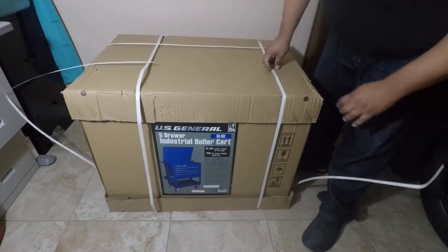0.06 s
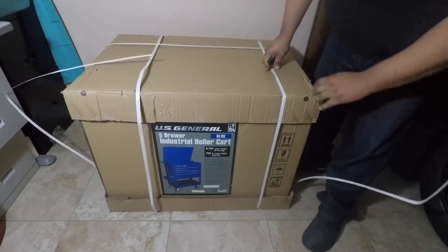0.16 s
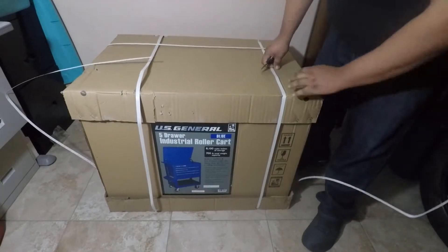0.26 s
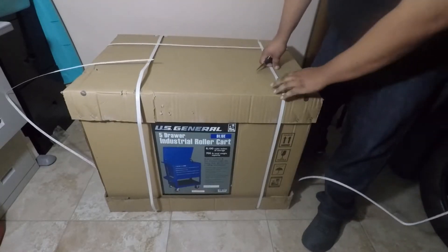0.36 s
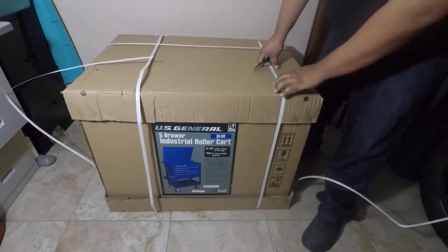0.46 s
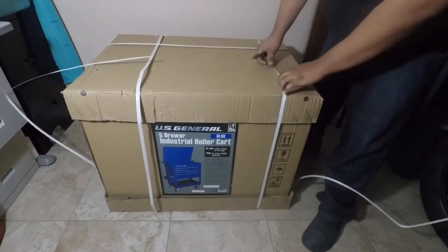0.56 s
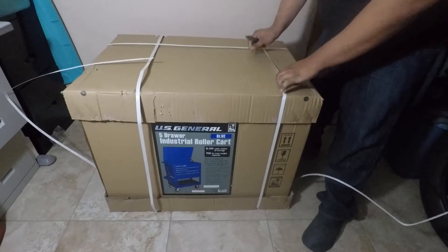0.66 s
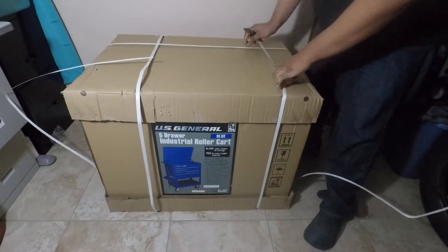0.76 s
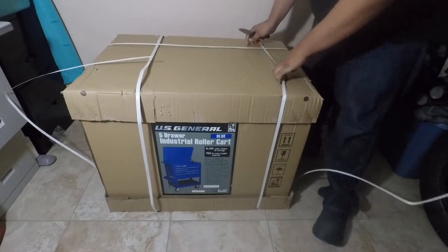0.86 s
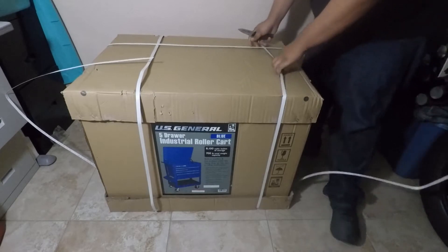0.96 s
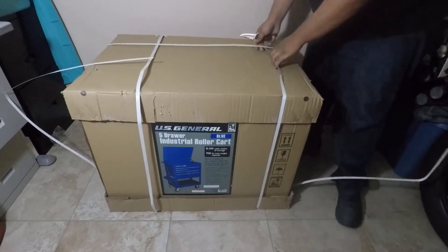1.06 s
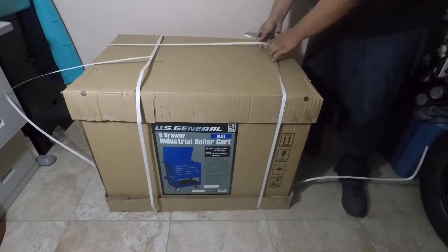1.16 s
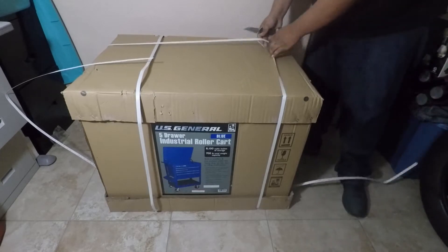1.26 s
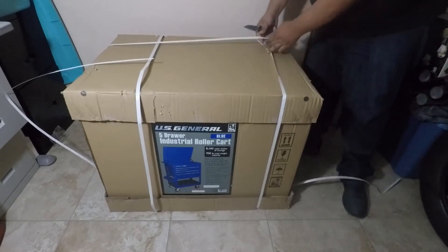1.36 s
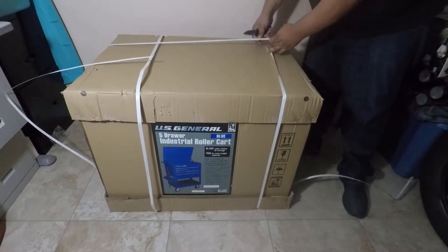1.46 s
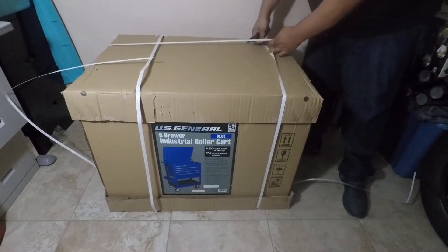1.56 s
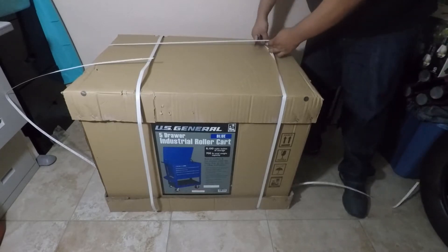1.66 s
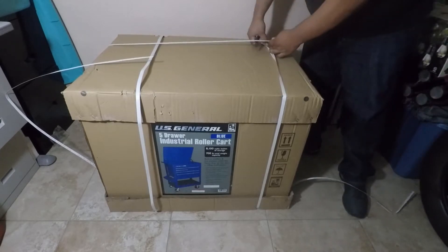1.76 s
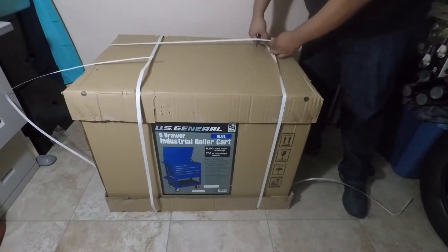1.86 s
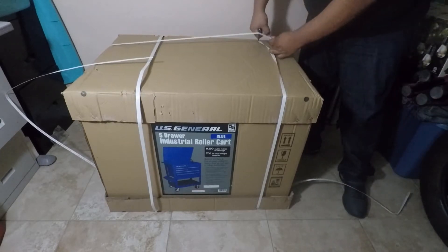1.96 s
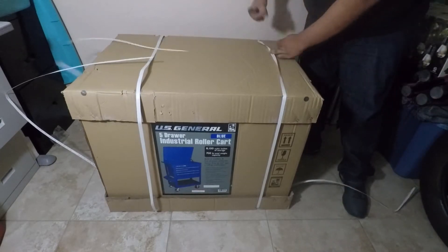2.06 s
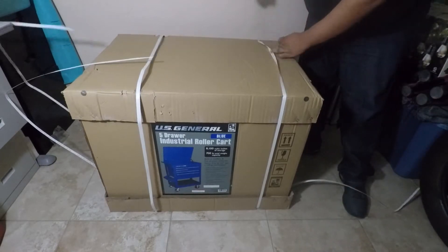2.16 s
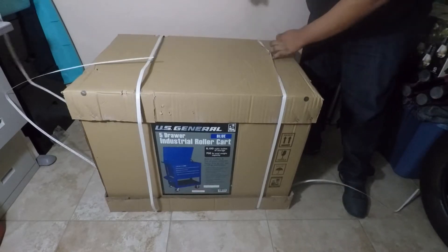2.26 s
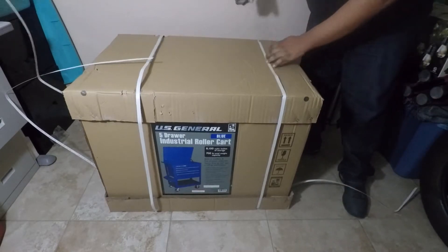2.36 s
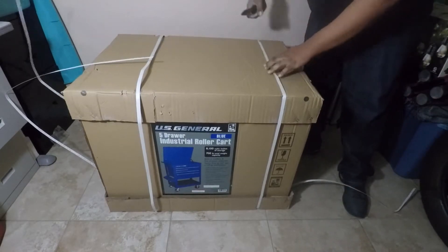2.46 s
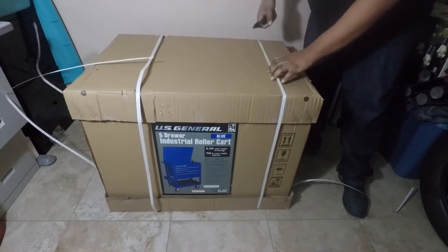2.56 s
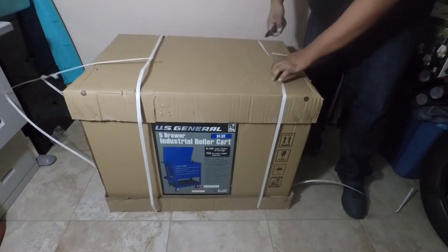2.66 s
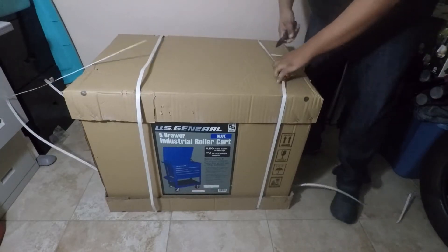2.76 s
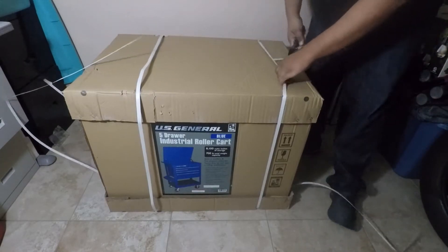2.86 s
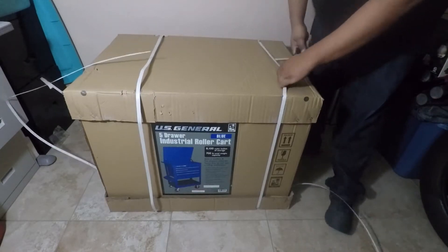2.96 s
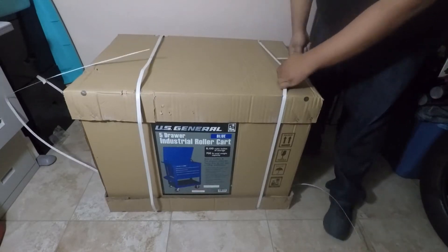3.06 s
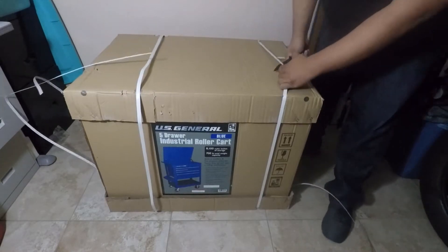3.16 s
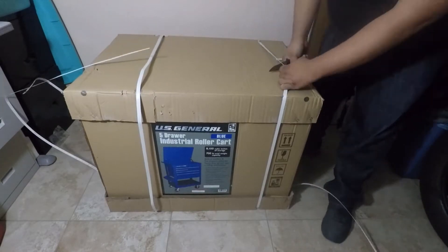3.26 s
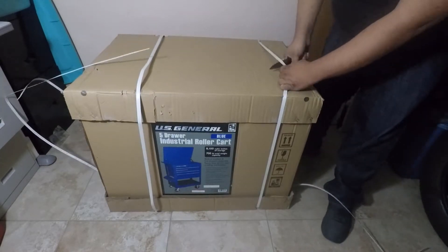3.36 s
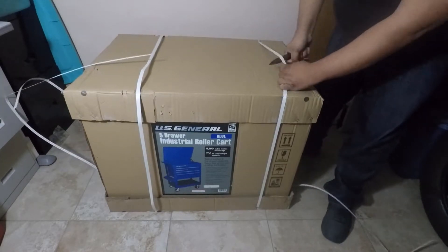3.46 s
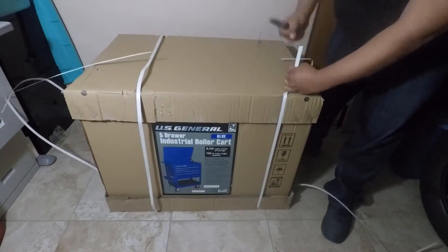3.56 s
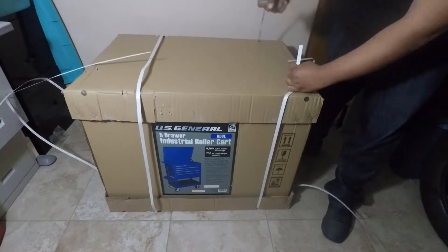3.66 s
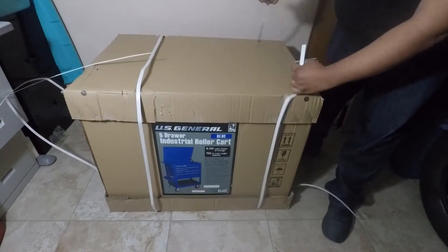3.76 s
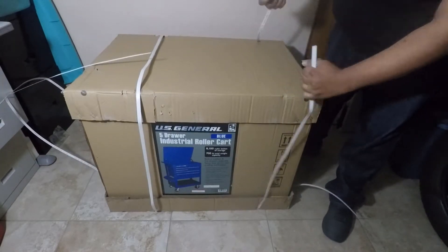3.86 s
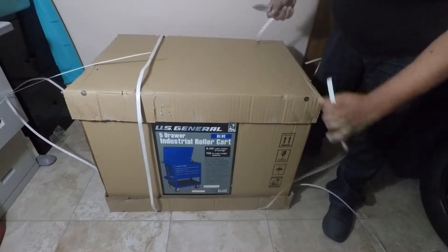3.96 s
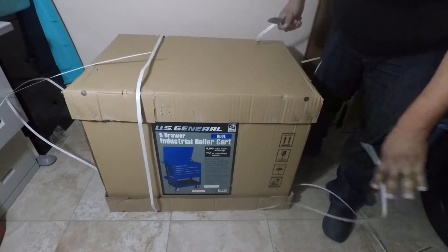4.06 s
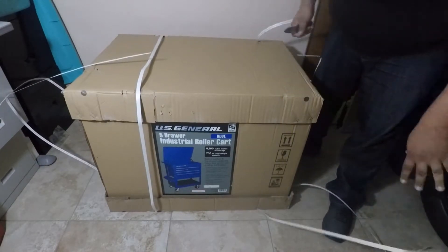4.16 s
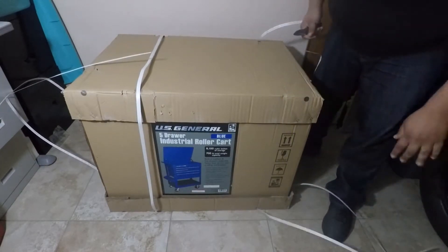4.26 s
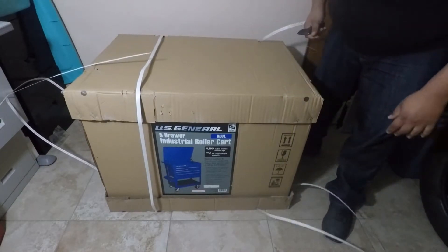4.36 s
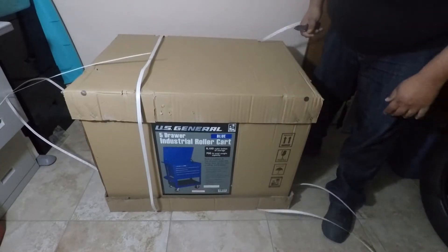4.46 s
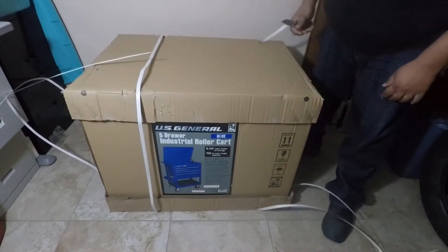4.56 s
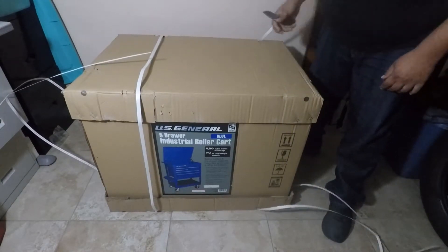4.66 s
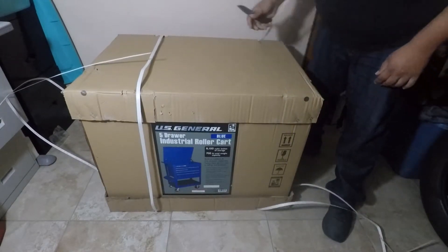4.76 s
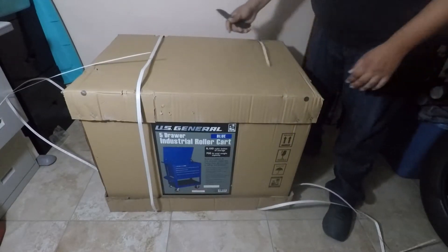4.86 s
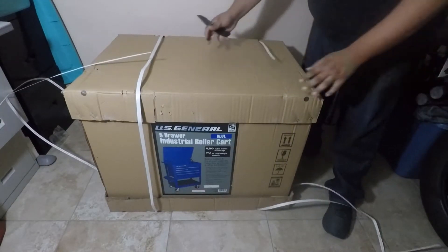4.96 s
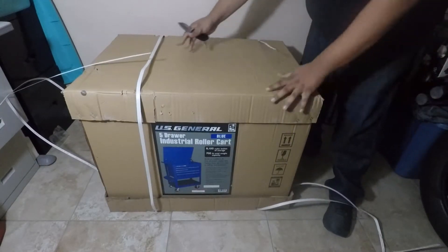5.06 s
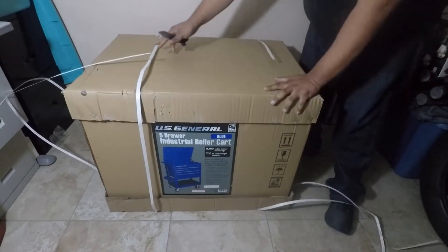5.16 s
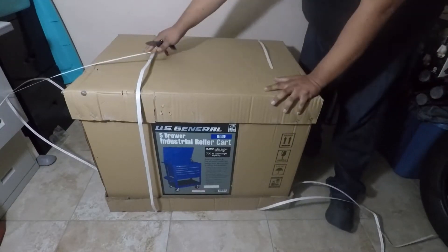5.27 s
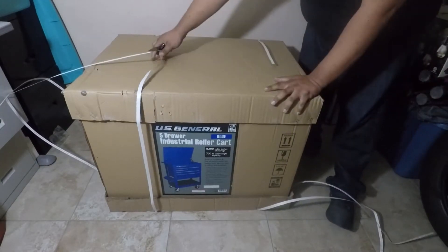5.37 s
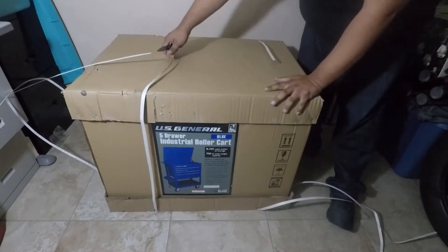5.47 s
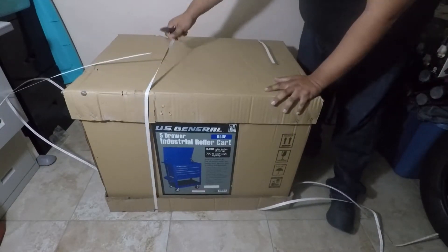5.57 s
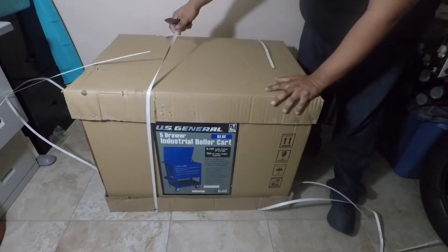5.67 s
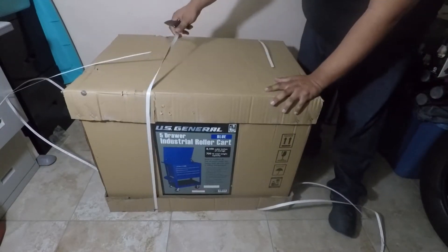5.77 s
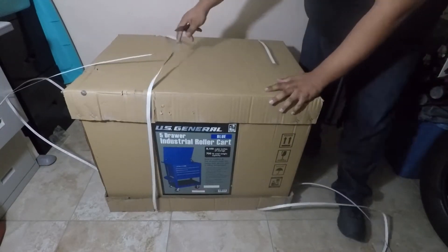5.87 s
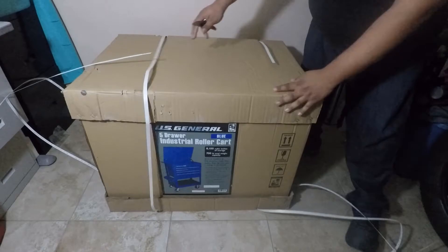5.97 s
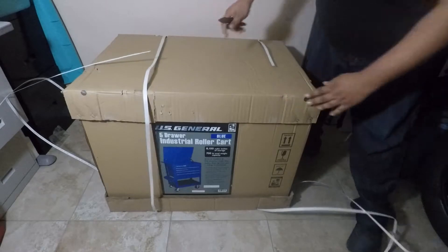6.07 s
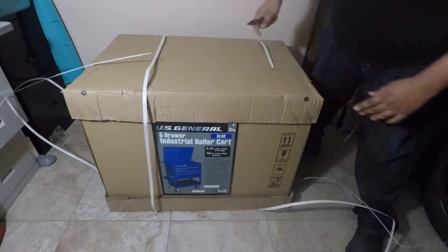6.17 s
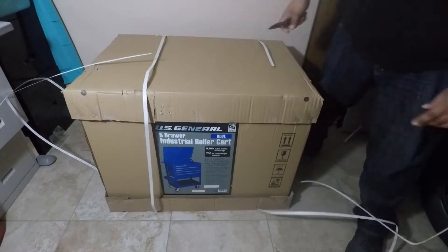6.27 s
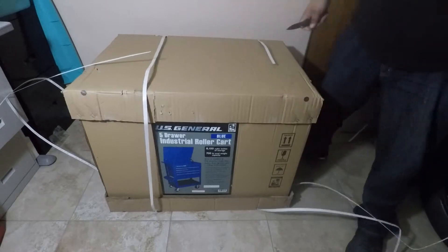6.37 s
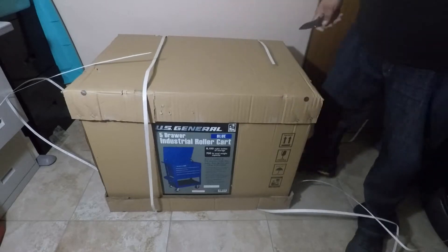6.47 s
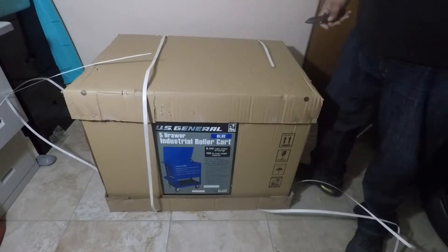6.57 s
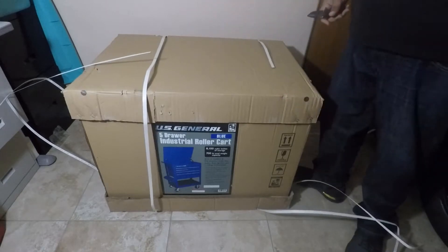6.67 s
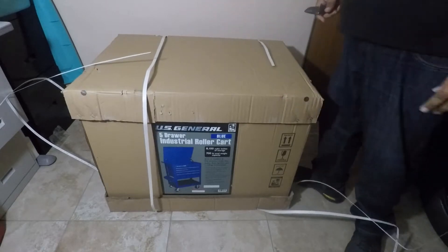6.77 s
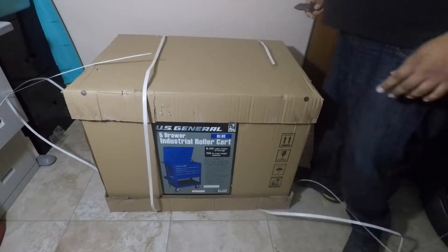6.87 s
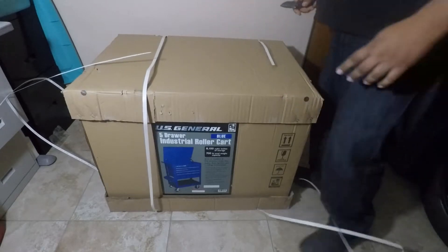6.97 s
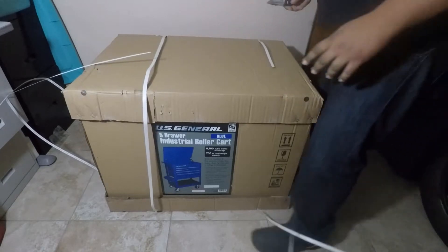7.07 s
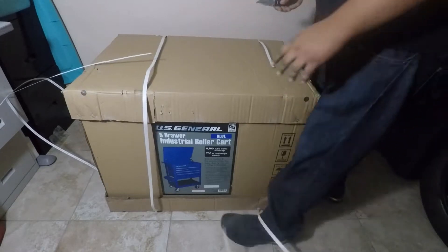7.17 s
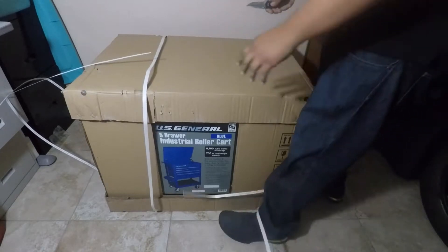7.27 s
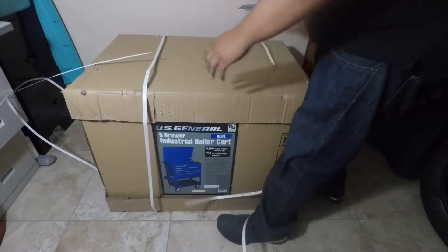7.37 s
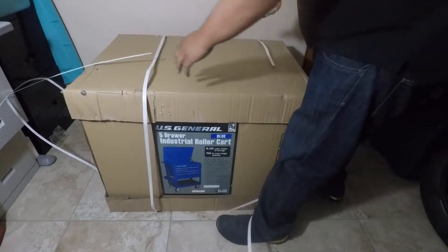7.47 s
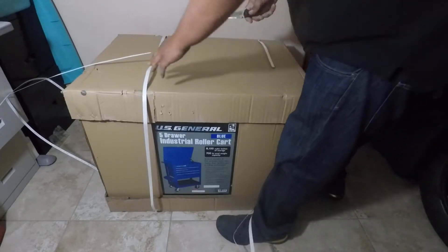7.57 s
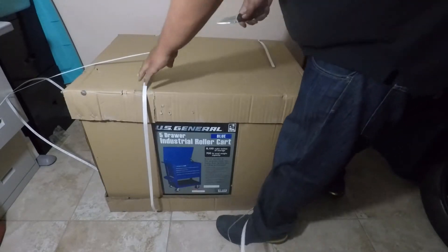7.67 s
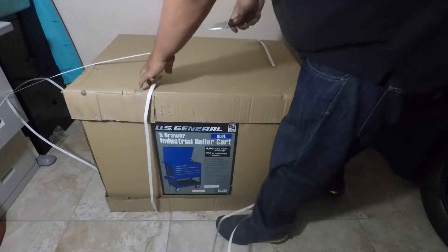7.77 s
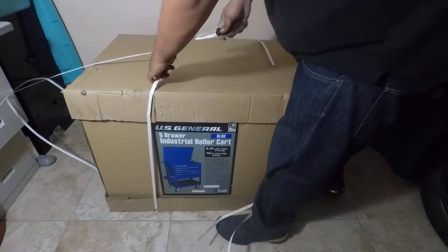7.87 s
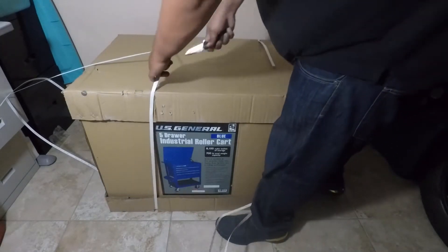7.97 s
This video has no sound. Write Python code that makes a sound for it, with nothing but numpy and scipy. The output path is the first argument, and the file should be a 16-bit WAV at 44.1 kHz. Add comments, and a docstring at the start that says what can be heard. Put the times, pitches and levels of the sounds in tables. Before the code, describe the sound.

Two loud strap snaps boom a big carton, then dragging hiss, a brief blade ring, a short judder and a weaker snap.

```python
"""Small tiled room, close to a big cardboard box: plastic packing straps are cut off it. First the straps tick
and scrape over the cardboard and hands bump the lid, as they do throughout. At 2.0 s a taut strap cracks, booms
the box and overloads the microphone; its freed end hums. Another parts at 3.5 s, an end flicks off the blade at
4.3 s, a dragged strap judders at 5.5 s and a weaker snap follows at 5.9 s; pulls, slaps, a scuff over the tiles
and bumps close the scene. Noise bursts, damped modes and filtered noise make it."""
import sys
import numpy as np
from scipy import signal
from scipy.fft import rfft, irfft
from scipy.io import wavfile
from scipy.ndimage import uniform_filter1d

SR = 44100
rng = np.random.default_rng(int(sys.argv[2]) if len(sys.argv) > 2 else 0)


def master(y):
    """Save y as 16-bit WAV."""
    cut = np.clip(np.atleast_2d(y).T, -1, 1)
    pcm = np.round(cut * 32767)  # scale
    wavfile.write(sys.argv[1], SR, pcm.astype(np.int16))


N = 353682
T = np.arange(N) / SR
HIT = T[:16384]  # time axis of one hit [s]

# All levels are at the source, ahead of the room and the microphone.
# Taut straps letting go: (time [s], crack level [dB], crack t60 [s], treble tilt [dB/octave],
# box boom level [dB], lid ring level [dB])
STRAP_SNAPS = [(2.043, -5, 0.081, -0.6, -13, -12), (3.5236, -4.5, .05, 0.8, -9, -26.5),
               (5.9190, -16, 0.0167, -0.06, -29.5, -15)]
# Spectrum of a parting strap: (frequency [Hz], relative level [dB])
CRACK_SPECTRUM = [(24, -31.5), (40, -12.5), (133, -8), (312, -11), (402, -5), (479, -9), (542, -5.5),
                  (1410, -9.5), (2150, -15.5), (3650, -15), (4800, -21), (7360, -20), (11800, -42),
                  (14500, -33), (16000, -46.5)]
# Modes of the box: (frequency [Hz], relative level [dB], t60 [s])
BOX_MODES = [(57, -19, 0.33), (95, -6, 0.24), (127, -4.5, 0.1), (162, 0, 0.11), (216, -4.5, 0.22),
             (258, 1.5, 0.13), (310.2, -3, 0.33), (351, -12.5, .15), (475, -4.5, 0.11), (604.4, -9, .09),
             (699, -6, 0.069), (800, -6, 0.041), (1060, -4.5, 0.082), (1180, -9.5, 0.15), (1432, -8.5, .17)]
# Modes of the free middle of the lid: (frequency [Hz], relative level [dB], t60 [s])
LID_MODES = [(309.7, 3.5, 0.15), (272, -2.5, 0.094), (360, -12.5, 0.18), (630, -9, 0.014),
             (1410, -16, 0.061)]
# Loose ends slapping box and tiles: (time [s], nominal level [dB], t60 [s], treble tilt [dB/octave])
END_SLAPS = [(0.003, -38, 0.077, 5), (2.089, -22.5, 0.035, 5), (3.542, -20.5, .01, 12),
             (3.55, -32, 0.022, 12), (3.6149, -20.5, 0.051, 0.2), (3.9145, -43.5, 0.014, 3),
             (4.318, -38, 0.02, -1), (7.3454, -22, 0.012, 0.5), (7.3556, -31, 0.013, -2.5)]
# Spectrum of a flat slap: (frequency [Hz], relative level [dB])
SLAP_SPECTRUM = [(47, -47), (80, -9.5), (283, -7.5), (431, -7.5), (575, -2), (1050, -8.5), (1430, -9),
                 (2080, -6), (3790, -12), (4620, -16), (8230, -17), (15000, -37.5), (16000, -61)]
# Bending modes of a loose end: (frequency [Hz], relative level [dB], t60 [s])
STRAP_MODES = [(1431, -3.5, 0.083), (1740, -8.5, .04), (2410, -2, 0.017), (3690, -8, .025),
               (4036, -1.5, 0.029)]
# Ticks of blade and strap edge: (time [s], nominal level [dB], brightest frequency [Hz], t60 [s])
EDGE_TICKS = [(0.031, -45, 6300, 0.007), (0.562, -40, 6160, 0.05), (0.852, -44.5, 7100, 0.19),
              (1.316, -49, 5000, 0.058), (1.345, -43.5, 5850, 0.0075), (1.561, -44.5, 3670, 0.029),
              (1.7348, -45.5, 3620, 0.022), (1.753, -42, 5260, 0.044), (1.977, -48, 3840, .025),
              (2.034, -33, 4000, 0.091), (2.372, -42.5, 5650, 0.025), (2.888, -44.5, 3080, 0.027),
              (3.0544, -48, 5500, .004), (3.314, -52.5, 4960, .01), (3.799, -45, 4516, 0.055),
              (4.52, -50.5, 5000, .01), (4.631, -51, 7030, 0.015), (4.9055, -34, 7450, 0.01),
              (4.9455, -44, 9000, 0.0045), (5.118, -41, 11700, 0.017), (5.120, -35.5, 1620, 0.024),
              (5.324, -50, 7200, 0.013), (5.3794, -40, 7240, 0.041), (5.6359, -35.5, 3900, 0.0045),
              (5.9279, -25, 6070, 0.0042), (6.608, -52, 6015, 0.043), (7.276, -44.5, 8000, 0.11),
              (7.7592, -41.5, 6830, 0.0066), (7.919, -42, 4570, 0.0067)]
# Modes of the blade: (frequency [Hz], relative level [dB], t60 [s])
BLADE_MODES = [(7140, -10, .2), (7600, -3, 0.17), (7967, 8, 0.22), (8300, -2.5, .22), (8750, -13.5, .18),
               (4170, -5, 0.16), (2530, -11, 0.22)]
# Pulls of a strap over the cardboard: (start [s], length [s], share spent speeding up [0-1],
# edge hiss gain [dB], cardboard rub gain [dB])
STRAP_PULLS = [(0.21, 0.39, 0.17, -62, -65.5), (0.458, 0.14, 0.24, -50, -49.5),
               (0.568, 0.12, 0.27, -57.5, -45.5), (0.706, .16, 0.47, -57.5, -58),
               (0.828, .34, 0.14, -46, -48), (1.06, 0.3, .3, -53, -54.5), (1.317, 0.14, 0.21, -70, -49.5),
               (1.725, 0.16, 0.16, -61, -48.5), (1.894, 0.15, 0.68, -51, -48),
               (2.113, 0.27, .3, -44, -41.5), (2.402, 0.23, 0.1, -45.5, -49),
               (2.595, 0.16, 0.32, -44.5, -42.5), (2.756, 0.091, 0.57, -42.5, -42),
               (2.841, 0.12, .1, -54.5, -53), (2.938, 0.49, 0.11, -65, -60),
               (3.41, 0.15, 0.46, -57.5, -54.5), (3.729, 0.15, 0.37, -52.5, -47.5),
               (4.501, 0.42, 0.16, -63, -65), (4.986, 0.12, 0.36, -58.5, -57),
               (5.347, 0.18, 0.62, -40.5, -40), (5.536, 0.17, 0.37, -47.5, -46),
               (5.74, 0.24, 0.23, -52, -52), (5.942, 0.19, 0.17, -48, -62),
               (6.602, 0.074, 0.13, -52.5, -58), (7.169, .17, 0.47, -53.5, -57), (7.43, 0.3, .3, -61, -63),
               (7.736, 0.35, .15, -51.5, -51.5)]
# Spectrum of the sliding edge: (frequency [Hz], relative level [dB])
HISS_SPECTRUM = [(710, -32), (1200, -8), (1430, 0), (1750, -7), (7660, -4.5), (12300, -14), (14700, -11),
                 (15500, -16), (16000, -38)]
# Spectrum of the rubbed cardboard: (frequency [Hz], relative level [dB])
RUB_SPECTRUM = [(21, -35.5), (35, -3), (59, -4), (133, -4), (166, -3), (231, -4.5), (305, 0), (376, -3),
                (677, -3.5), (1060, -10), (1430, -10), (1760, -23), (2200, -19.5), (2860, -48),
                (4840, -120)]
# Hands and straps bumping the cardboard, and at 7.16-7.22 s a strap scuffing over the tiles, falling in pitch:
# # (time [s], nominal level [dB], contact corner [Hz], rattle t60 [s])
BUMPS_AND_SCUFF = [(0.002, -31.5, 715, 0.043), (0.404, -38.5, 201, 0.063), (0.852, -31.5, 383, 0.036),
                   (0.878, -27.5, 350, 0.02), (1.321, -38, 790, 0.17), (1.563, -40.5, 684, 0.02),
                   (1.751, -39.5, 905, 0.053), (2.818, -36.5, 600, 0.058), (3.244, -44, 450, 0.075),
                   (3.915, -40, 874, 0.017), (4.915, -37, 850, 0.18), (5.096, -34.5, 245, 0.028),
                   (5.119, -23, 347, 0.022), (5.273, -37.5, 336, 0.014), (5.324, -42, 400, 0.052),
                   (5.381, -37.5, 400, 0.067), (6.198, -52, 906, 0.0173), (6.67, -47.5, 903, 0.043),
                   (7.1566, -45, 1900, 0.018), (7.181, -42.5, 950, .03), (7.223, -51, 450, 0.046),
                   (7.756, -40, 405, 0.022), (7.891, -36.5, 220, .08), (7.919, -40.5, 755, 0.029)]
# The box's broad walls giving under a push: (time [s], level [dB])
WALL_PUSHES = [(0.41, -39), (1.291, -38), (2.5, -34.5), (2.76, -39.5), (5.128, -33.5), (5.326, -35),
               (5.458, -29.5), (7.754, -39)]
# Echo of the room: (band centre [Hz], level against the direct sound [dB], t60 [s])
ROOM_ECHO = [(65, -6, 0.29), (269, -4, 0.25), (730, -3, 0.29), (1320, -2, 0.27), (3000, -2.5, 0.35),
             (7000, -2, 0.33), (14100, -4, 0.18)]
# Spectrum of the steady room noise: (frequency [Hz], relative level [dB])
QUIET_SPECTRUM = [(12, -26.5), (20, -7.5), (33, -20), (60, -24.5), (113, -27), (262, -23.5), (319, -30.5),
                  (499, -27.5), (1400, -31), (1710, -33.5), (9140, -39), (14700, -47.5), (16000, -52)]


def snaps(heave_hz=112):
    """The strap parts with a bright click and tears apart; the unloaded walls heave once and ring on."""
    out = np.zeros(N)
    heave_band = [heave_hz / 1.4, heave_hz * 1.5]
    for s, crack_db, t60, tilt_db, boom_db, lid_db in STRAP_SNAPS:
        click = strength(burst(0.0072), crack_db - 16)
        tear = strength(colour(burst(t60), CRACK_SPECTRUM, tilt_db), crack_db)
        body = strength(ring(BOX_MODES), boom_db) + strength(ring(LID_MODES), lid_db)
        heave = strength(band(burst(0.045), heave_band, "bandpass"), boom_db - 3)
        add(out, s, click)
        add(out, s, tear)
        add(out, s + 0.0011, body)
        add(out, s + 0.004, heave)
    return out


def twang(start=2.16, hz=180, slack_hz=156, db=-27.5, t60=0.79, waver=0.049, waver_db=3):
    """The freed strap hums, sinking in pitch and wavering as it slackens."""
    out = np.zeros(N)
    pitch = slack_hz + (hz - slack_hz) * np.exp(-HIT / 0.114)
    pitch = pitch * (1 + waver * walk(23.7)[:len(HIT)])
    onset = 1 - np.exp(-HIT / 0.0077)
    swing = fade(HIT, t60) * onset * undb(waver_db * walk(25.7)[:len(HIT)])
    phase = 2 * np.pi * np.cumsum(pitch) / SR
    add(out, start, strength(np.sin(phase) * swing, db))
    return out


def strap_ends(clack_db=-4.5, tip_db=-11.5, tip_t60=0.028, tip_width=0.09):
    """Flat slaps are broad and make the plastic clack; an edge only ticks, with a short ring of its own."""
    out = np.zeros(N)
    for s, db, t60, tilt_db in END_SLAPS:
        slap = strength(colour(burst(t60), SLAP_SPECTRUM, tilt_db), db - 1)
        clack = strength(ring(STRAP_MODES), db + clack_db)
        add(out, s, slap + clack)
    for s, db, hz, t60 in EDGE_TICKS:
        edge = band(burst(t60), hz / 1.8, "highpass", order=1)
        edge = band(edge, hz * 1.3, "lowpass")
        # the short free end rings near the tick's brightest pitch
        tip_band = [hz / (1 + tip_width), hz * (1 + tip_width)]
        tip = band(burst(tip_t60), tip_band, "bandpass")
        add(out, s, strength(edge, db - 0.3) + strength(tip, db + tip_db))
    return out


def knife(flick_s=4.3238, ring_s=4.3242):
    """A strap end flicks off the blade, which rings briefly in its damped modes."""
    out = np.zeros(N)
    add(out, flick_s, strength(band(burst(0.008), [7300, 8900], "bandpass"), -32))
    add(out, flick_s, strength(band(burst(0.0094), [1500, 6000], "bandpass"), -34.5))
    add(out, ring_s, strength(ring(BLADE_MODES), -37.5))
    return out


def pull(start, length, rise, release=0.28):
    """Speed of the strap in one pull, 0-1: it gathers speed, holds it and slows to rest."""
    done = (T - start) / length
    # rise and release are shares of the pull
    return np.clip(np.minimum(done / rise, (1 - done) / release), 0, 1)


def friction(grain_db, flutter_db):
    """Countless tiny slips of unequal size, in uneven surges."""
    size = np.minimum(rng.exponential(size=N), 6)
    return rng.standard_normal(N) * undb(grain_db * size + flutter_db * walk(45))


def slides(rub_lead_s=0.008):
    """The strap's edge hisses over the paper while the hollow box rumbles under it."""
    hiss_gain, rub_gain = np.zeros(N), np.zeros(N)
    for s, length, rise, hiss_db, rub_db in STRAP_PULLS:
        hiss_gain += undb(hiss_db) * pull(s, length, rise)
        # the cardboard takes the load just before the edge slides
        rub_gain += undb(rub_db) * pull(s - rub_lead_s, length, rise)
    hiss = level(colour(friction(grain_db=3.5, flutter_db=2.1), HISS_SPECTRUM), -2.5)
    rub = level(colour(friction(grain_db=3.5, flutter_db=2.9), RUB_SPECTRUM), -2.4)
    return hiss * hiss_gain + rub * rub_gain


def judder(start=5.4535, length=0.024, hz=238, db=-17, overtone_db=-17):
    """The dragged strap sticks and slips for a few cycles, pumping the lid, which rings on after."""
    out, t = np.zeros(N), T[:int(length * SR)]
    phase = 2 * np.pi * hz * t
    swell = signal.windows.tukey(len(t), 0.4)
    overtones = np.sin(2 * phase) + np.sin(3 * phase) / 2
    pumping = level(np.sin(phase) + undb(overtone_db) * overtones, db)
    scrape = band(rng.standard_normal(len(t)), [4500, 10000], "bandpass", order=1)
    scrape = level(scrape * (1 + np.sin(phase)), -34.5)  # the hiss pulses with each cycle
    add(out, start, swell * pumping)
    add(out, start, swell * scrape)
    add(out, start + length, strength(ring(LID_MODES), -22.5))
    return out


def bumps_and_scuff():
    """Soft blows and a scuff over the tiles: a dead contact sound and a little ring of box and lid."""
    out = np.zeros(N)
    for s, db, hz, t60 in BUMPS_AND_SCUFF:
        contact = strength(band(burst(t60), [hz / 2.6, hz * 1.36], "bandpass"), db - 0.5)
        body = ring(BOX_MODES) + undb(1.5) * ring(LID_MODES)
        body = strength(band(body, [hz / 3, hz], "bandpass"), db - 2)
        add(out, s, contact + body)
    return out


def flexes(push_t60=0.5):
    """The big panels sway with a deep, damped boom: a noise burst held to the lowest band."""
    out = np.zeros(N)
    for s, db in WALL_PUSHES:
        add(out, s, strength(band(burst(push_t60), [38, 76], "bandpass"), db))
    return out


def fidgets(count=24, db=-60, spread_db=3):
    """Slack straps shift and tick faintly at random moments."""
    out = np.zeros(N)
    for when, size in rng.uniform(size=(count, 2)):
        tick_db = db + spread_db * (2 * size - 1)
        add(out, when * T[-1], strength(band(burst(0.012), [2500, 7000], "bandpass"), tick_db))
    return out


def room(x, direct_db=0, wall_hz=1430, wall_db=-5, wall_t60=0.38):
    """Close walls and tiles: a dense echo, different from every spot, with one lingering resonance."""
    t = T[:SR // 2]
    centres = np.array(ROOM_ECHO)[:, 0]
    edges = [25, *np.sqrt(centres[1:] * centres[:-1]), 18000]
    rows = [(edges[k:k + 2], db, t60) for k, (_, db, t60) in enumerate(ROOM_ECHO)]
    rows.append(([wall_hz - 140, wall_hz + 140], wall_db, wall_t60))
    echo = np.zeros(len(t))
    for (lo, hi), db, t60 in rows:
        tail = band(rng.standard_normal(len(t)), [lo, hi], "bandpass", order=4)
        tail = tail * fade(t, t60) * (1 - np.exp(-t / 0.0011))
        # each band carries energy in proportion to its width
        width_share = abs(hi - lo) / (SR / 2)
        echo += tail * undb(db) * np.sqrt(width_share / np.sum(tail ** 2))
    return undb(direct_db) * x + signal.fftconvolve(x, echo)[:N]


def air(quiet_db=-62, rumble_db=-68):
    """Faint steady room noise over a slowly heaving rumble."""
    rumble = band(rng.standard_normal(N), [20, 60], "bandpass") * undb(3.8 * walk(6.9))
    quiet = colour(rng.standard_normal(N), QUIET_SPECTRUM, size=8192)
    return level(quiet, quiet_db) + level(rumble, rumble_db)


def burst(t60, count=3):
    """A contact: a train of tiny fractures that dies away, even in spectrum and so without a pitch."""
    x = rng.standard_normal(len(HIT)) * fade(HIT, t60) * (1 - np.exp(-HIT / 0.00032))
    for _ in range(count):
        flat = irfft(np.exp(1j * np.angle(rfft(x))))  # keep the phases, level the spectrum
        x = flat * fade(HIT, 10 * t60)
    return x


def ring(modes):
    """Damped modes, each with its share of the energy; a random sign stands for where the blow lands."""
    out = np.zeros(len(HIT))
    for hz, db, t60 in modes:
        mode = np.sin(2 * np.pi * hz * HIT) * fade(HIT, t60)
        out += rng.choice([-1, 1]) * strength(mode, db)
    return out


def walk(rate):
    """Smooth random wander around 0, with about `rate` new targets a second."""
    k = int(SR / rate)
    return uniform_filter1d(np.repeat(rng.standard_normal(N // k + 1), k), k)[:N]


def colour(x, spectrum, tilt_db=0, size=2048):
    """Minimum-phase filter through (frequency [Hz], level [dB]) points, tilted about 1 kHz."""
    hz, db = np.transpose(spectrum)
    octave = np.log2(np.maximum(np.arange(size // 2 + 1) * SR / size, 1) / 1000)
    gain_db = np.interp(octave, np.log2(hz / 1000), db) + tilt_db * octave
    cepstrum = irfft(np.log(undb(gain_db)))
    # folding the cepstrum forward makes the filter causal
    cepstrum[1:size // 2] *= 2
    cepstrum[size // 2 + 1:] = 0
    return signal.fftconvolve(x, irfft(np.exp(rfft(cepstrum))))[:len(x)]


def band(x, hz, kind, order=2):
    """Butterworth filter, its corners kept inside the usable range."""
    corners = np.clip(hz, 10, 0.45 * SR)
    return signal.sosfilt(signal.butter(order, corners, kind, fs=SR, output="sos"), x)


def fade(t, t60):
    """Exponential decay, down 60 dB after t60 seconds."""
    return np.exp(-np.log(1000) * t / t60)


def undb(db):
    """Decibels to gain."""
    return 10 ** (np.asarray(db) / 20)


def level(x, db):
    """Set the level of a steady sound by its standard deviation."""
    return x * undb(db) / np.std(x)


def strength(x, db):
    """Set the energy of a hit: that of 5 ms at this level."""
    return x * undb(db) / np.sqrt(np.sum(x ** 2) / (0.005 * SR))


def add(out, s, x):
    """Mix x into out from time s."""
    i = max(int(s * SR), 0)
    out[i:i + len(x)] += x[:N - i]


def scene():
    """All the handling in the room; ends and knocks reach the microphone with less direct sound."""
    cuts = room(snaps(), direct_db=0.5)
    ends = room(strap_ends() + knife() + fidgets(), direct_db=-1)
    knocks = room(bumps_and_scuff() + flexes() + twang(), direct_db=-1.5)
    rubbing = room(slides(), direct_db=0.5)
    stutter = judder()
    # the lid faces the microphone, so its judder excites less echo
    lid = 0.38 * stutter + room(0.62 * stutter)
    return (cuts + ends + knocks + rubbing + lid + air())[None]


def record(dry, top_hz=15450):
    """The microphone overloads smoothly on loud sounds such as the snaps; the top is cut."""
    overloaded = np.tanh(dry)
    return signal.sosfilt(signal.ellip(10, 0.2, 80, top_hz, fs=SR, output="sos"), overloaded)


dry = scene()
out = record(dry)
master(out)
```